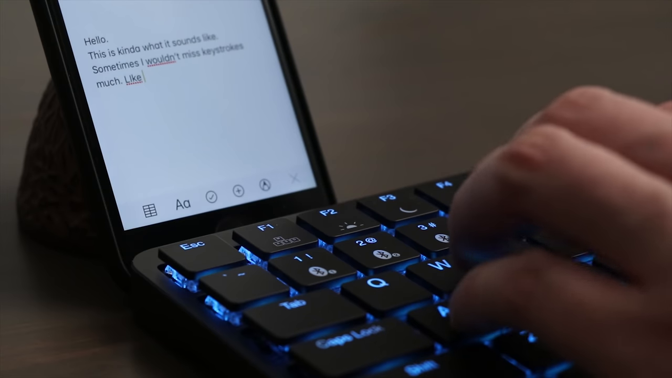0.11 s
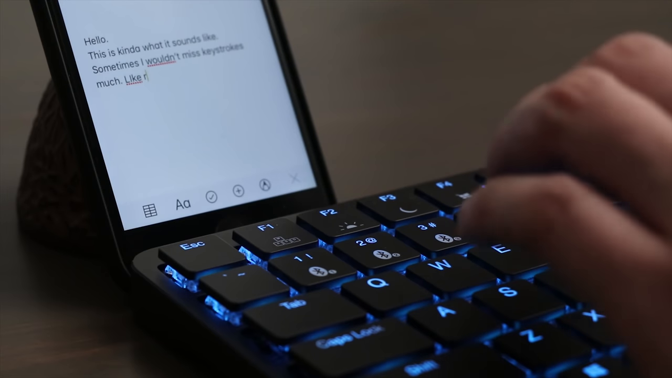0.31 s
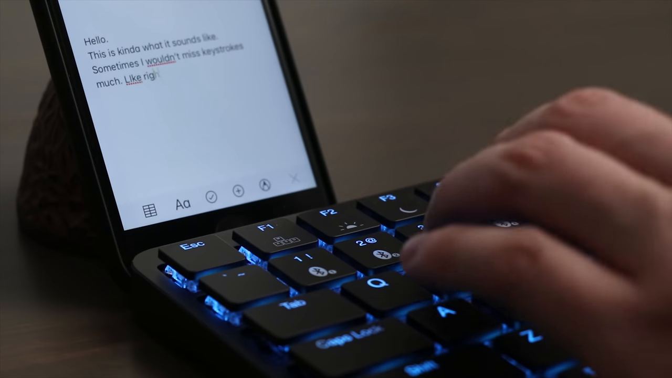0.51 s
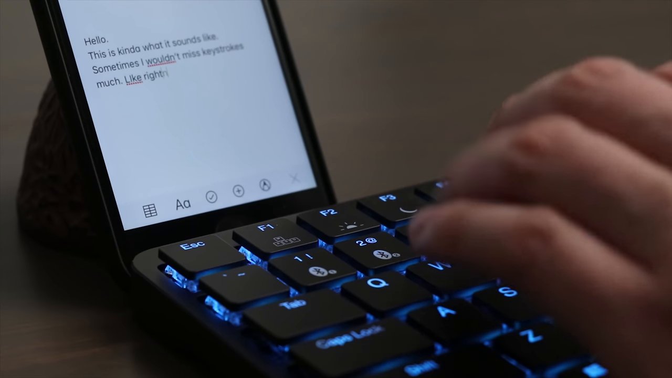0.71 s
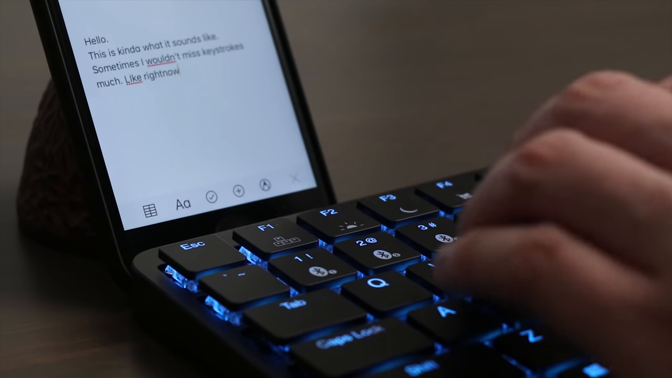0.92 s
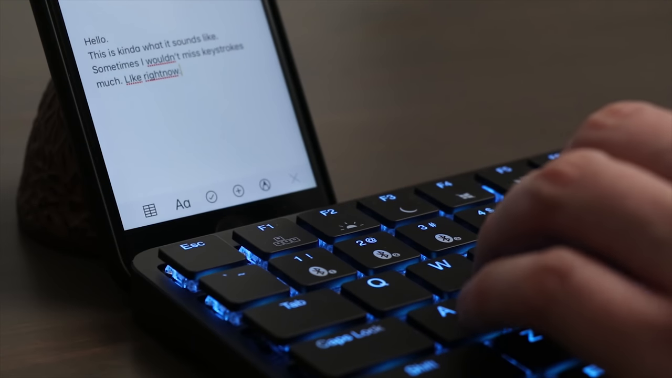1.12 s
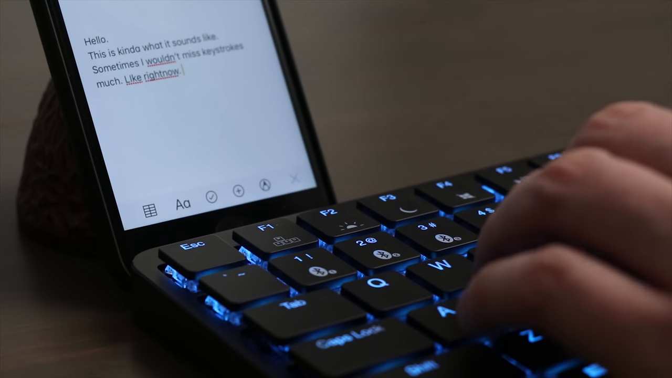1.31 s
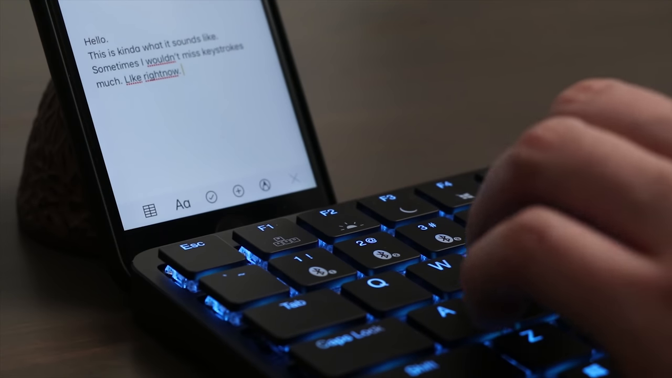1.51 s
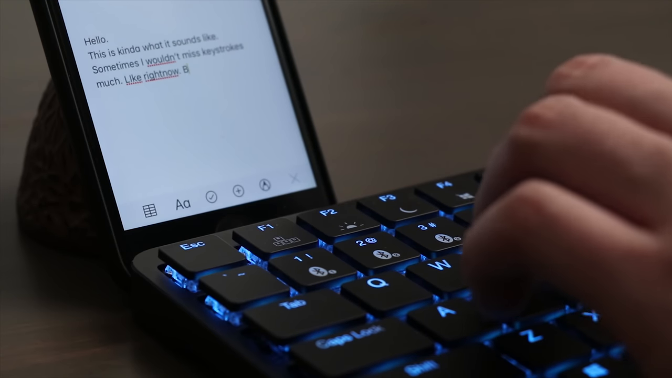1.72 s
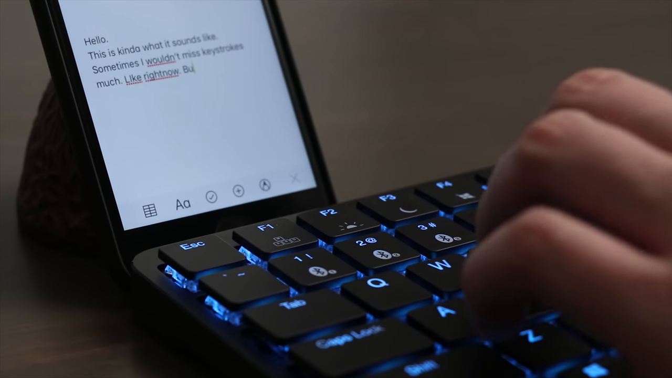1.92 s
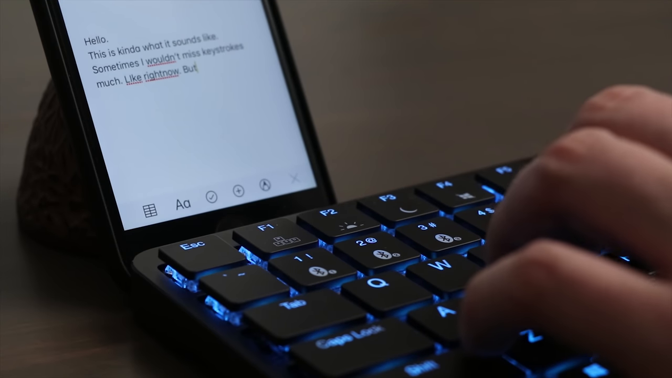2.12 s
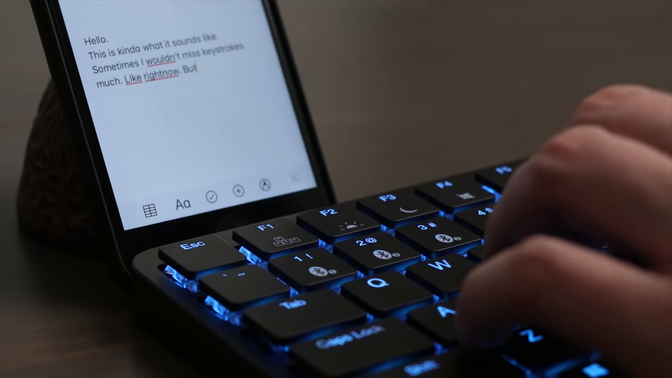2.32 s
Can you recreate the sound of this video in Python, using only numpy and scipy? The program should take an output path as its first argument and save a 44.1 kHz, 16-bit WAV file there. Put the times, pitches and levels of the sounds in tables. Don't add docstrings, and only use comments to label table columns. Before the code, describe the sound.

Fingers rattle off a fast run of keys on a small clicky keyboard, stop briefly, then press a few more. Sharp spring clicks, plastic clacks and faint metallic ringing, heard close in a quiet room.

```python
import sys
import numpy as np
from scipy import signal
from scipy.fft import rfft, irfft
from scipy.io import wavfile

SR = 44100
rng = np.random.default_rng(int(sys.argv[2]) if len(sys.argv) > 2 else 0)


def waveform_to_disk(signal):
    frames = np.transpose(np.atleast_2d(signal))
    scaled = np.clip(frames, -1, 1) * 32767
    samples = np.round(scaled).astype(np.int16)
    wavfile.write(sys.argv[1], SR, samples)


def invert_db(x):
    u = np.asarray(x, float) / 20
    return 10 ** u


N = 110250
SPECTRUM_HZ = np.fft.rfftfreq(N, 1 / SR)
TOP_HZ = 15800

# start_s, peak_db, cap_pitch_hz, case_level_db
TAPS = [(0.2385, -33.5, 3360, 1), (0.2634, -45, 1600, -8), (0.281, -31, 3430, -33),
        (0.3038, -26, 2560, -17), (0.328, -39, 3000, -24), (0.345, -40, 3500, -17),
        (0.39, -21.5, 2880, -15), (0.417, -40, 3970, -24), (0.451, -29, 3780, -18), (0.516, -40, 2530, -5),
        (0.547, -31, 2800, -9), (0.5516, -25, 2960, -17), (0.588, -39.5, 2610, -17),
        (0.619, -46.5, 1510, -5), (0.6658, -28.5, 2760, -7), (0.6687, -28, 3130, -12),
        (0.73, -37.5, 2500, -8), (0.7332, -24, 3100, -18), (0.737, -28.5, 3220, -9),
        (0.8173, -23.5, 3460, -17), (0.9996, -24.5, 3800, -16), (1.003, -31.5, 2700, 0),
        (1.0086, -25.5, 3100, -12), (1.0535, -43, 1530, -9), (1.0842, -36.5, 4840, -5),
        (1.087, -37, 4800, -8), (1.127, -47.5, 3500, -4), (1.5618, -31, 3670, -22),
        (1.605, -44.5, 3880, -33), (1.78, -44, 3100, -22), (1.8349, -38, 2720, 2), (1.862, -40.5, 3900, -5),
        (1.8524, -33.5, 3840, -42)]
# start_s, peak_db, pitch_hz, upper_partials_db
SNAPS = [(0.2454, -18, 8650, -16.5), (0.3081, -15, 8210, -15.5), (0.3124, -26, 9040, -28),
         (0.3869, -25, 6770, -4), (0.399, -20.5, 6850, -12.5), (0.4606, -21, 7920, -12.5),
         (0.483, -18.5, 7550, -18), (0.5458, -24, 7800, -14), (0.556, -23.5, 8700, -8.5),
         (0.6405, -20, 8370, -11), (0.68, -23, 7830, -13), (0.738, -30, 6750, 2), (0.728, -38, 8300, -15),
         (0.7997, -20.5, 8320, -19), (0.8172, -32, 8000, -21), (0.8268, -19.5, 8200, -12),
         (0.87, -23.5, 8450, -17), (0.902, -19.5, 8300, -22), (0.999, -27.5, 8700, -26),
         (1.0046, -20, 8300, -21), (1.0702, -23, 8300, -16), (1.0763, -25, 8540, -21),
         (1.1117, -24, 8060, -12), (1.119, -34.5, 8400, -7), (1.144, -46, 8300, -15),
         (1.1762, -25.5, 8340, -16), (1.184, -37.5, 8300, -26), (1.209, -49, 8040, -14),
         (1.5708, -21, 8570, -12), (1.641, -24.5, 8680, -11.5), (1.6733, -37.5, 7550, -11),
         (1.7123, -34, 9400, -13), (1.7606, -24, 7740, -11.5), (1.774, -35.5, 8150, -18),
         (1.8411, -27.5, 8440, -14), (1.8463, -32.5, 7500, -32), (1.854, -41, 8400, -25),
         (1.872, -41, 8900, -25), (1.8868, -21, 8600, -16), (1.9593, -51, 9200, -20),
         (1.9734, -21.5, 8220, -9.5), (1.9813, -37, 8270, -16), (1.985, -41.5, 8700, -14)]
# start_s, peak_db, cap_pitch_hz, case_level_db, case_pitch_hz
CLACKS = [(0.2515, -20, 3470, -16.5, 1540), (0.3123, -12.5, 2557, -55, 1280),
          (0.4027, -19.5, 2850, -26, 1290), (0.468, -24, 3030, -33, 1190), (0.4846, -20, 2465, -7.5, 1493),
          (0.5579, -25.5, 2280, -16, 1330), (0.644, -26, 3880, -13.5, 1490), (0.6861, -18, 3610, -19, 1630),
          (0.7412, -17.5, 2750, -24, 1244), (0.8041, -29, 2850, -25, 1270), (0.8317, -26, 4390, -23, 2570),
          (0.874, -18, 2530, -16.5, 1760), (0.9057, -25, 3100, -4, 1500), (1.0046, -25, 4000, -10, 1480),
          (1.0759, -24.5, 4000, -8, 1163), (1.114, -24.5, 3730, -11.5, 1450),
          (1.181, -30, 4260, -1.5, 1254), (1.5804, -32, 2305, -28.5, 1220),
          (1.6452, -29, 2230, -10.5, 1440), (1.6732, -23, 3780, -18, 1900), (1.713, -32.5, 3810, -11, 1730),
          (1.7548, -23.5, 2180, -17.5, 1520), (1.764, -24, 2620, -25, 1370),
          (1.8452, -18.5, 3850, -8, 1448), (1.8939, -27, 2320, -17, 1580), (1.98, -37.5, 3480, -7, 1315)]

CAP_T60, CASE_T60, CASE_HZ = 0.0094, 0.017, 1335
TAP_RISE_S, CLACK_RISE_S = 0.001, 0.0009


def evened(x):
    return x / np.sqrt(np.mean(x ** 2) + 1e-20)


def read(points, hz):
    f, value = np.transpose(points)
    return np.interp(np.log(hz + 1), np.log(f + 1), value)


def add(mix, s, sound):
    part = mix[round(s * SR):][:len(sound)]
    part += sound[:len(part)]


def ring(t, hz, db, t60, turns=0):
    return invert_db(db - 60 * t / t60) * np.sin(2 * np.pi * (hz * t + turns))


def struck(own, shared, contact_s, db, bounce_s, rise_s):
    scatter_db, detune = 2.0, 0.057
    bounces, bounce_db = 9, -0.5
    t = np.arange(round(0.06 * SR)) / SR
    key = sum(ring(t, hz, d, t60) for hz, d, t60 in own)
    board = np.zeros(len(t))
    for hz, d, t60 in shared:
        louder, higher, sign = rng.standard_normal(3)
        board += np.sign(sign) * ring(t, hz * (1 + detune * higher), d + scatter_db * louder, t60)

    def contact(s):
        return np.diff(np.exp(-0.5 * ((t[:600] - s) / contact_s * 4 - 3) ** 2), prepend=0)

    first = contact(0)
    when, size = rng.random((bounces, 2)).T
    strength = invert_db(bounce_db - 25.4 * when) * (2 * size - 1) * 2
    hits = first + sum(a * contact(s) for s, a in zip(when * bounce_s, strength))
    sound = signal.oaconvolve(key, first) + signal.oaconvolve(board, hits)
    sound = sound[:len(t)] * np.tanh(t / rise_s)
    return invert_db(db) * sound / abs(sound).max()


def crack(db, rise_s):
    t = np.arange(1200) / SR
    band = signal.butter(2, (1205, 6500), "band", fs=SR)
    grit = evened(signal.lfilter(*band, rng.standard_normal(len(t))))
    return invert_db(db - 11.5 - 60 * t / 0.007) * np.tanh(t / rise_s) * grit


def hiss():
    # pitch_hz, level_db (per Hz)
    colour = [(12, -34), (20, 7.5), (91, -13), (135, -5.5), (200, -6), (237, -8), (1020, -23), (15200, -29),
              (16500, -26.5)]
    whine_hz, whine_width_hz = 6170, 310
    air_shape = invert_db(read(colour, SPECTRUM_HZ)) * (SPECTRUM_HZ < TOP_HZ)
    air = evened(irfft(rfft(rng.standard_normal(N)) * air_shape, N))
    whine_shape = 1 / (1 + ((SPECTRUM_HZ - whine_hz) / whine_width_hz) ** 4)
    whine = evened(irfft(rfft(rng.standard_normal(N)) * whine_shape, N))
    return invert_db(-65.5) * air + invert_db(-85) * whine


def caps():
    # pitch_hz, level_db, t60_s
    cap_modes = [(2072, -21.5, 0.02), (2700, -5, 0.0063), (3298, -7, 0.0069), (4180, -8, 0.0035),
                 (5416, -11, 0.0037), (8000, -12, 0.0034), (12170, -36, .004)]
    out = np.zeros(N)
    for s, db, hz, case_db in TAPS:
        modes = [(hz, 0, CAP_T60), (CASE_HZ, min(case_db + 8.5, 0), CASE_T60)]
        add(out, s, struck(modes, cap_modes, 0.000085, db, 0.0044, TAP_RISE_S))
        add(out, s, crack(db, TAP_RISE_S))
    for s, db, hz, case_db, case_hz in CLACKS:
        modes = [(hz, 0, CAP_T60), (case_hz, case_db + 12.5, CASE_T60),
                 (case_hz * 1.296, case_db + 6.5, CAP_T60), (case_hz * 0.705, case_db, CAP_T60)]
        add(out, s, struck(modes, cap_modes, 0.00012, db - 0.5, 0.0055, CLACK_RISE_S))
        add(out, s, crack(db, CLACK_RISE_S))
    return out


def shell():
    # pitch_hz, level_db
    colour = [(700, -15.5), (1300, -3), (1800, -7), (2800, -6), (4500, -8.5), (6500, -15), (8500, -20),
              (14000, -21.5)]
    spring_hz, spring_width_hz, spring_lift_db = 8300, 1150, 15
    blows, pings = np.zeros(N), np.zeros(N)
    for s, db, *_ in TAPS + CLACKS:
        blows[round(s * SR)] += invert_db(db + 10)
    for s, db, *_ in SNAPS:
        pings[round(s * SR)] += invert_db(db - 10.5)
    lift = invert_db(spring_lift_db / (1 + ((SPECTRUM_HZ - spring_hz) / spring_width_hz) ** 2))
    bright = lift * SPECTRUM_HZ ** 2 / (SPECTRUM_HZ ** 2 + spring_hz ** 2)
    both = rfft(blows) * invert_db(read(colour, SPECTRUM_HZ)) + rfft(pings) * bright
    return irfft(both * (SPECTRUM_HZ < TOP_HZ), N)


def rattle():
    taps_per_s, t60 = 2700, 0.03
    t = np.arange(SR // 8) / SR
    hit = rng.random(len(t)) < taps_per_s / SR
    taps = hit * rng.standard_normal(len(t)) * invert_db(-60 * t / t60) * (t > 0.002)
    return taps / np.linalg.norm(taps)


def room():
    # pitch_hz, t60_s
    decay = [(200, 0.72), (1300, 0.2), (3000, 0.28), (8500, 0.35), (15000, 0.18)]
    taps = np.zeros(SR // 2)
    at = np.arange(200, len(taps) - 20, 20)
    taps[at + rng.integers(0, 20, len(at))] = rng.choice([-1., 1.], len(at))
    hz, t, z = signal.stft(taps, SR, nperseg=256)
    fade = invert_db(-60 * t / read(decay, hz)[:, None])
    tail = signal.istft(z * fade, SR, nperseg=256)[1]
    return tail / np.linalg.norm(tail)


def spread(x, tail_of):
    turn = np.arange(N) / SR * 2 * np.pi * 3
    out = np.zeros(N)
    for k in range(3):
        share = np.cos(turn + k * 2 * np.pi / 3) * np.sqrt(2 / 3)
        out += signal.oaconvolve(x * share, tail_of())[:N]
    return out


def snaps():
    # pitch_hz, level_db, t60_s
    upper = [(11640, 7, 0.0023), (13380, 8.5, .0035), (14700, -6, 0.0027), (15600, -7, 0.0026)]
    # pitch_hz, level_db, t60_s
    body = [(3100, -13.5, .003), (3850, -7.5, 0.012), (4815, -9.5, 0.0027), (5900, -15, .003),
            (7250, -9, 0.0042), (8820, -15.5, 0.0022)]
    out = np.zeros(N)
    for s, db, hz, top_db in SNAPS:
        own = [(hz, 0, 0.008), (hz * 1.016, -3, 0.005)]
        shared = [(f, d + top_db + 7.5, t60) for f, d, t60 in upper] + body
        add(out, s + 0.00072, struck(own, shared, 0.00007, db, 0.0015, 0.00019))
    return out


def thumps():
    # start_s, peak_db, pitch_hz, desk_level_db, rumble_db
    blows = [(0.252, -51.5, 322, 0.5, -3), (0.315, -36.5, 187.4, -6, -23), (0.395, -45, 193, 2, -2),
             (0.415, -47.5, 526, -2, -6), (0.469, -48, 321, 4.5, -2), (0.562, -45, 181, 2, -3),
             (0.615, -54.5, 190, 1, 5), (0.688, -42.5, 195, -0.5, -0.5), (0.699, -52, 350, -3, -12),
             (0.738, -44, 198, -10, -2), (0.824, -43, 220, -17, -1), (0.874, -58, 223, -2, 7),
             (1.012, -38.5, 212, -7.5, -6), (1.015, -42.5, 327, -26, -20), (1.08, -42, 256.6, -18, 0.5),
             (1.088, -44, 346.5, -26, -2), (1.118, -51.5, 282, -2.5, -0.5), (1.569, -50.5, 183, -3.5, -1.5),
             (1.681, -47, 140, -8.5, 0), (1.756, -42, 186, -2.5, -3.5), (1.801, -52, 181, -8, -9),
             (1.846, -59, 197, -13, -1), (1.896, -52, 180, -8, 3.5)]
    t60, desk_hz, desk_t60, rise_s = 0.11, 78, 0.3, 0.02
    out, t = np.zeros(N), np.arange(SR) / SR
    swell = np.sin(np.pi / 2 * np.minimum(t / rise_s, 1)) ** 2
    band = signal.butter(1, [90, 415], "band", fs=SR)
    for s, db, hz, desk_db, rumble_db in blows:
        modes = [(hz, 0, t60), (desk_hz, desk_db - 3.5, desk_t60),
                 (desk_hz * 1.5, desk_db - 7.5, t60), (desk_hz * 0.59, desk_db - 6.0, t60)]
        thump = sum(ring(t, *mode, rng.random()) for mode in modes)
        rumble = evened(signal.lfilter(*band, rng.standard_normal(SR)))
        rumble = rumble * invert_db(rumble_db - 4.5 - 60 * t / 0.25)
        add(out, s - rise_s / 2, invert_db(db) * swell * (thump + rumble))
    return out


def wire():
    # start_s, level_db
    rings = [
        (.313, -87),
        (.403, -68),
        (.906, -64.5),
        (1.846, -58),
        (1.98, -77),
    ]
    out, t = np.zeros(N), np.arange(SR) / SR
    beat = 1 + 0.5 * np.sin(2 * np.pi * 16.0 * t)
    for s, db in rings:
        add(out, s, ring(t, 960, db, 1) * beat)
    return out


def plate():
    # start_s, level_db, pitch_hz, t60_s
    rings = [
        (1.186, -54.5, 1249, 0.26),
        (0.38, -61, 1500, 0.11),
        (1.848, -53, 1600, 0.1),
        (1.676, -54, 3200, 0.13),
    ]
    out, t = np.zeros(N), np.arange(SR) / SR
    beat = 1 + 0.59 * np.cos(2 * np.pi * 26.0 * t)
    for s, db, hz, t60 in rings:
        add(out, s, ring(t, hz, db, t60) * beat)
    return out


def scene():
    drive = shell()
    keys = caps() + snaps() + thumps() + wire() + plate()
    keys = keys + invert_db(5.5) * spread(drive, rattle) + invert_db(2) * spread(drive, room)
    noise_shape = (SPECTRUM_HZ < TOP_HZ) / (1 + SPECTRUM_HZ / 14000)
    side = invert_db(-73) * irfft(rfft(rng.standard_normal(N)) * noise_shape, N)
    side = side + invert_db(-57.5) * signal.oaconvolve(keys, rattle())[:N]
    mid = keys + hiss()
    return np.array([mid + side, mid - side])


def roll_off(x):
    return signal.sosfilt(signal.butter(12, 16970, fs=SR, output="sos"), x)


def record(dry):
    low_pass = signal.firwin(511, 16500, window=("kaiser", 9), fs=SR)
    limited = signal.oaconvolve(dry, low_pass[None], "same")
    return roll_off(limited)


dry = scene()
out = record(dry)
waveform_to_disk(out)
```